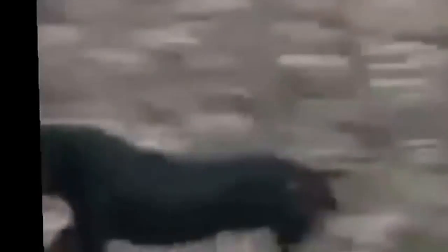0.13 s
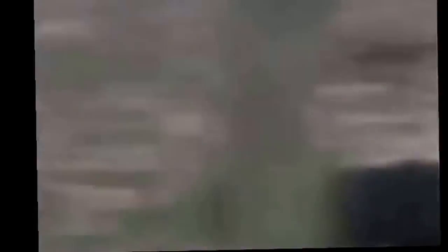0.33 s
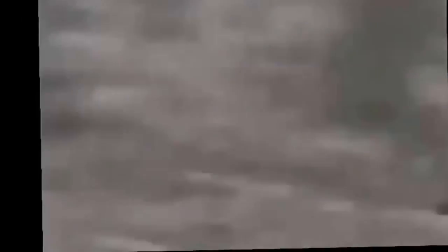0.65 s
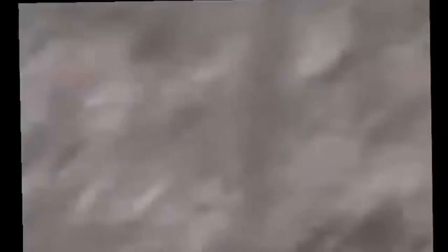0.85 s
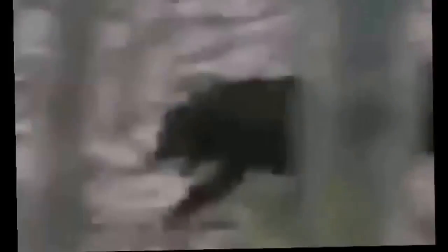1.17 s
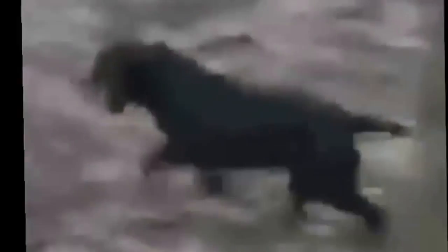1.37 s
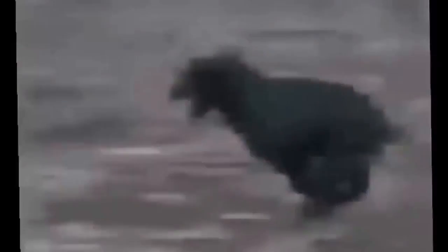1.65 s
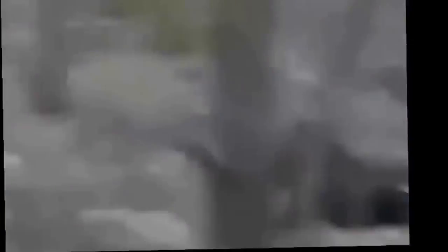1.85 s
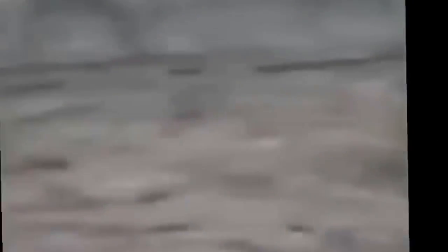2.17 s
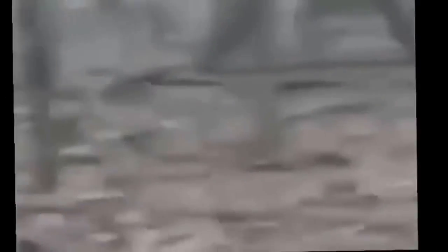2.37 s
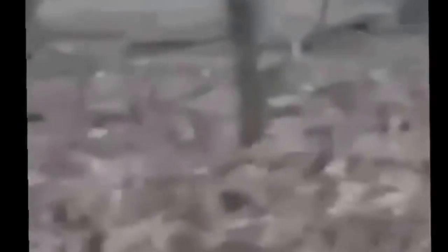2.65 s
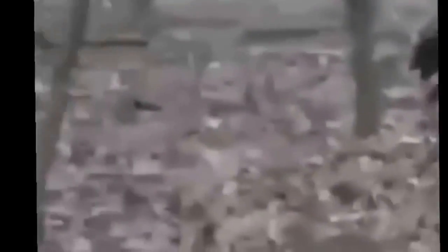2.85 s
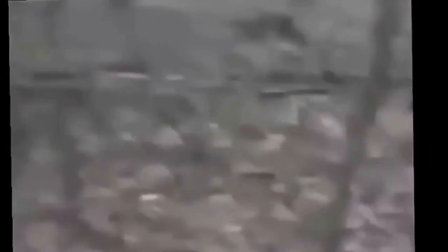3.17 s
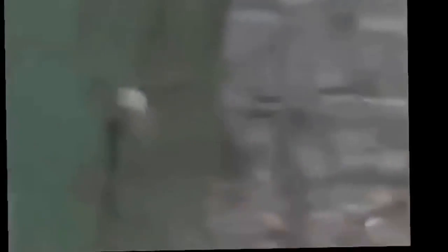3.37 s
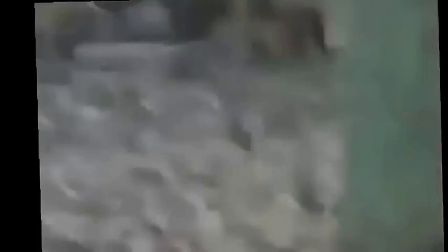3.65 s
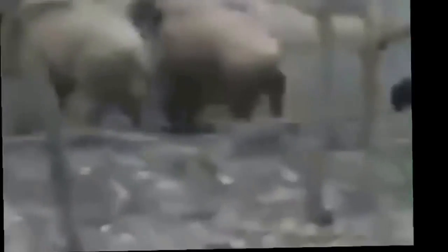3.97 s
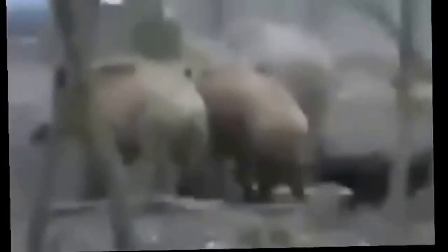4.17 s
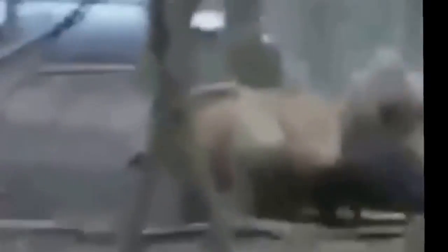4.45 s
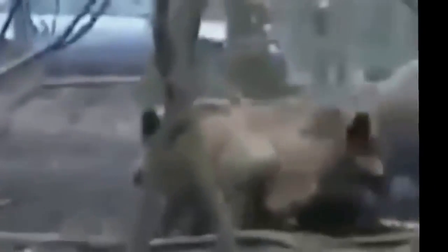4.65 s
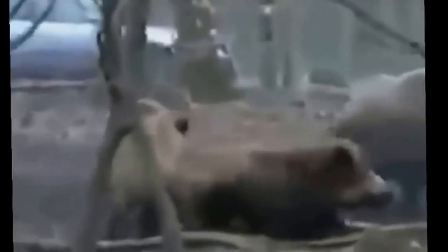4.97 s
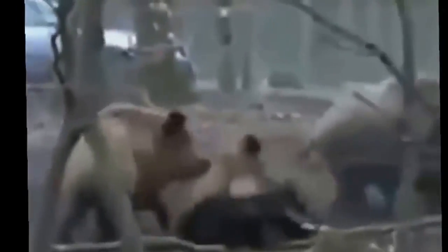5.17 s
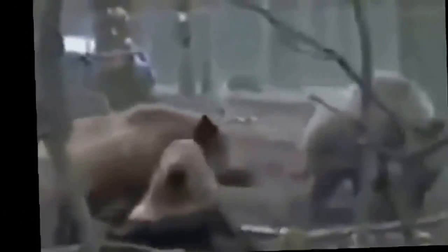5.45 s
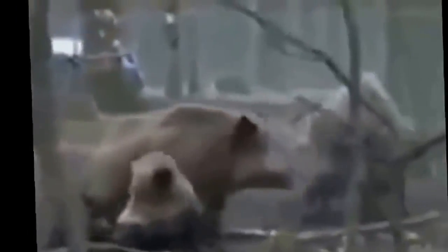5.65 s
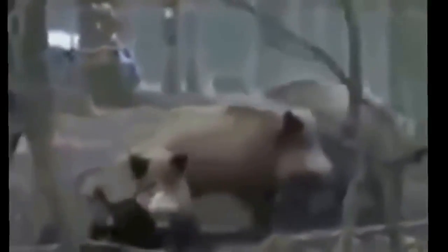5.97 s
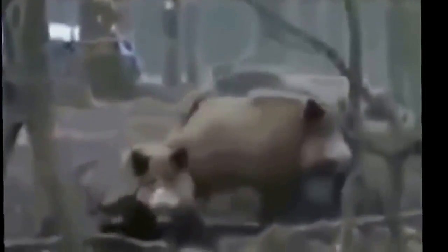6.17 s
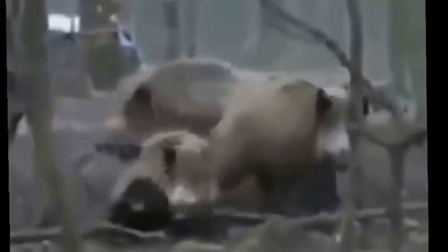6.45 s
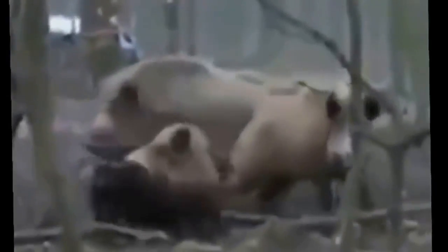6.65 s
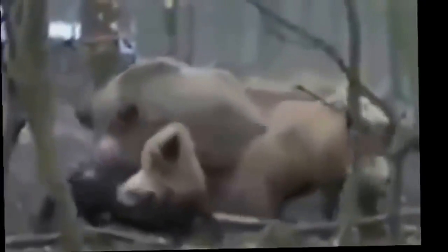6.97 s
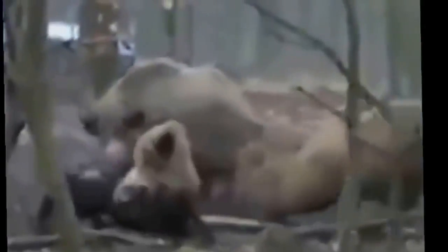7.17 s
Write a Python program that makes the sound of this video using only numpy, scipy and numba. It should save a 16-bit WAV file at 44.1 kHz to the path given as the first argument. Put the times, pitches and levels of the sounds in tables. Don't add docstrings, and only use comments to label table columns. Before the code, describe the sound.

A crowding herd of boars snorts and grunts irregularly over rustling leaf litter, hoarse squeals breaking out farther off, muffled low-grade sound.

```python
import sys
import numpy as np
from scipy import signal
from scipy.fft import dct
from scipy.io import wavfile
from scipy.ndimage import uniform_filter1d, minimum_filter1d
from numba import njit

SR = 44100
rng = np.random.default_rng(int(sys.argv[2]) if len(sys.argv) > 2 else 0)


def boost(x):
    u = np.asarray(x, float) / 20
    return 10 ** u


def materialize(psi):
    bounded = np.clip(np.atleast_2d(psi).T, -1, 1)
    quanta = np.round(bounded * 32767).astype(np.int16)
    wavfile.write(sys.argv[1], SR, quanta)


N = 322812


def rms_one(x):
    return x / np.sqrt(np.mean(x ** 2) + 1e-20)


def band_passed(x, low_hz, high_hz):
    return signal.sosfilt(signal.butter(2, [low_hz, high_hz], "band", fs=SR, output="sos"), x)


def high_passed(x, hz):
    return signal.sosfilt(signal.butter(2, hz, "high", fs=SR, output="sos"), x)


def in_time(rows):
    s, *columns = np.transpose(rows)
    return [np.interp(np.arange(N) / SR, s, c) for c in columns]


def at_hz(points, hz):
    points_hz, points_db = np.array(points).T
    return np.interp(np.log(hz), np.log(points_hz), points_db)


def full_rate(v):
    return np.interp(np.arange(N) / 32, np.arange(len(v)), v)


def peaks_db(start, hold, db, rise, fall):
    t = np.arange(0, N + 32, 32) / SR
    start, end = start[:, None], (start + hold)[:, None]
    return db[:, None] - rise * np.maximum(start - t, 0) - fall * np.maximum(t - end, 0)


def drift(rate):
    r = np.exp(-80 * np.pi * rate / SR)
    slow = signal.lfilter([1], [1, -2 * r, r * r], rng.standard_normal(N // 40 + 2002))[2000:]
    return np.interp(np.arange(N) / 40, np.arange(len(slow)), rms_one(slow))


@njit
def moving_pole(x, r, cosine):
    y = np.zeros(len(x))
    for i in range(2, len(x)):
        drive = (1 - r * r) / 2 * (x[i] - x[i - 2])
        y[i] = drive + 2 * r * cosine[i] * y[i - 1] - r * r * y[i - 2]
    return y


def resonance(x, hz, width_hz):
    cosine = np.cos(2 * np.pi * hz / SR) * np.ones(len(x))
    return moving_pole(x + 1e-18, np.exp(-np.pi * width_hz / SR), cosine)


def evened(x, span_s):
    size = int(span_s * SR)
    power = uniform_filter1d(uniform_filter1d(x ** 2, size=size), size=size)
    return x / np.sqrt(np.abs(power) + 1e-12)


def coloured(x, spectrum, patchy_db, rate):
    out, edges = 0, 27.5 * 2 ** np.arange(0, 8.6, .5)
    for low, high in zip(edges, edges[1:]):
        if high > spectrum[0][0]:
            level_db = at_hz(spectrum, np.sqrt(low * high)) + patchy_db * drift(rate)
            out = band_passed(x, low, high) * boost(level_db) - out
    return out


def squeal():
    # [t/s, level of lowest resonance/dB]
    bursts = [
        [(0.0, -40.5), (0.168, -46), (0.226, -29), (0.332, -55.5), (0.368, -37.5), (0.472, -45), (0.748, -53),
         (0.8, -40)],
        [(3.33, -42.5), (3.385, -36), (3.468, -37.5), (3.566, -39), (3.61, -41.5), (3.645, -50), (3.75, -40),
         (4.08, -48.5), (4.22, -66)],
        [(5.4, -52), (5.49, -30), (5.525, -29), (5.56, -44), (5.62, -38), (5.66, -42), (5.7, -52.5),
         (5.74, -50)],
        [(5.77, -42.5), (5.82, -37), (5.86, -36), (5.895, -41), (5.95, -38), (5.99, -37), (6.02, -50),
         (6.11, -43.5), (6.2, -69)],
    ]
    # [f/Hz, width/Hz, level/dB]
    tract = [(574.7, 14, 2), (1040, 70, 3), (1220, 77, -16.5), (1630, 230, -1), (1915, 40, -7.5),
             (3470, 450, -13)]
    level = 0
    for rows in bursts:
        level = level + boost(in_time([(rows[0][0] - .05, -90), *rows, (rows[-1][0] + 0.023, -90)])[0])
    voice = rng.standard_normal(N) * boost(2.0 * drift(65))
    slide = 1 + .011 * drift(5.5)
    out = 0
    for hz, width_hz, db in tract:
        ring = resonance(resonance(voice, hz * slide, 1.9 * width_hz), hz * slide, 1.9 * width_hz)
        out = out + boost(db + 1.8 * drift(14)) * evened(ring, 0.2)
    return level * boost(3.0) * out


def scuffle():
    # [t/s, level/dB]
    trampling = [(0.0, -39), (0.5, -32.5), (1.1, -33.5), (1.5, -39.5), (2.3, -41), (3.2, -41.5),
                 (3.65, -41), (4.2, -39.5), (4.72, -44.5), (5.1, -34), (5.6, -38.5), (6.1, -30.5),
                 (6.6, -40.5), (7.32, -38.5)]
    # [t/s, level/dB]
    hooves = [(0.342, -30), (0.936, -24.5), (0.959, -24.5), (1.089, -25.5), (1.592, -32.5), (2.0, -30),
              (2.382, -34), (2.67, -41.5), (3.33, -34), (3.85, -25), (4.78, -58), (4.972, -33.5),
              (5.288, -26), (5.73, -40), (5.992, -29.5), (6.322, -26), (6.692, -31.5), (6.85, -27),
              (7.16, -30.5), (7.261, -34)]
    # [f/Hz, density/dB per Hz]
    leaves = [(400, -19), (1500, 5.5), (3000, 5), (4200, 10), (6000, 5)]
    sizes = boost(1.0 * np.minimum(rng.exponential(1, N), 5)) * rng.choice([-1, 1], N)
    crackles_per_s = 5000 * boost(3.0 * drift(25))
    crackle = sizes * (rng.random(N) < crackles_per_s / SR)
    s, db = np.transpose(hooves)
    hooves_db = full_rate(peaks_db(s, 0 * s, db, rise=401, fall=190.5).max(0))
    level_db = np.maximum(in_time(trampling)[0], hooves_db) - 3.0
    return boost(level_db) * evened(coloured(crackle, leaves, patchy_db=5.0, rate=3.3), 0.067)


def forest():
    # [f/Hz, density/dB per Hz]
    colour = [(18, -52), (30, -11), (190, 4), (569, 3.5), (683, -19), (1010, -0.5), (1150, -13.5),
              (1480, -1), (7000, -20.5), (9100, -39.5), (15400, -120)]
    level_db = -42
    air = coloured(rng.standard_normal(N), colour, patchy_db=2.0, rate=9)
    return high_passed(boost(level_db) * rms_one(air), 110)


def trees(x):
    t = np.arange(SR // 2) / SR
    echoes = rng.standard_normal(len(t)) * boost(-60 * t / 0.21) * (t > .012)
    echoes = signal.lfilter([.3], [1, -.7], echoes)
    return signal.fftconvolve(x, echoes / np.sqrt(np.sum(echoes ** 2)))[:N]


def effort():
    # [start/s, hold/s, throat/dB, throat/Hz, snout above throat/dB]
    low_grunts = [(0.024, 0.052, -25.5, 236.5, -5.5), (0.233, 0.033, -20.5, 266.1, -7),
                  (0.38, 0.075, -31, 233, -7), (0.527, 0.071, -29.5, 257.4, -8),
                  (0.792, 0.063, -26.5, 243.3, -6), (0.942, .17, -25.5, 256.2, -7),
                  (1.285, 0.037, -28, 245.7, -8), (1.391, 0.062, -23, 292, -9),
                  (1.602, 0.12, -28.5, 244.5, -7), (1.704, 0.13, -27.5, 259.2, -7.5),
                  (2.156, 0.071, -27, 240.5, -10.5), (2.356, 0.11, -33, 228.5, -12),
                  (2.438, 0.065, -31.5, 223, -9), (2.662, 0.024, -33, 238, -3.5),
                  (2.722, 0.058, -28.5, 242.8, -6.5), (2.833, 0.12, -32, 247, -8),
                  (3.085, 0.02, -25.5, 261.4, -4.5), (3.273, 0.081, -28.5, 250, -5.5),
                  (3.569, 0.016, -29.5, 266, -1), (3.717, 0.051, -32, 231.6, 0),
                  (4.385, 0.048, -30.5, 252.5, -4.5), (5.164, 0.056, -28, 221.5, -1.5),
                  (5.816, 0.083, -29, 262, -5), (6.283, 0.12, -29.5, 239.4, -6.5),
                  (6.571, 0.046, -28.5, 213.2, -3.5)]
    # [start/s, hold/s, throat/dB, throat/Hz, snout above throat/dB]
    high_grunts = [(1.995, 0.042, -25.5, 326, -10), (2.058, 0.049, -25.5, 276.4, -8.5),
                   (3.846, 0.069, -27.5, 302.4, 1), (4.829, 0.026, -27.5, 341, -7),
                   (5.056, 0.049, -31, 334, 0.5), (5.282, 0.058, -26, 334, -11.5),
                   (5.455, 0.059, -23.5, 319.3, -13.5), (5.713, 0.041, -28, 294, -5),
                   (5.972, 0.048, -28, 277, -4.5), (6.044, 0.11, -27.5, 326.3, -3),
                   (6.224, .06, -27.5, 334, -1), (6.658, 0.061, -29.5, 281.3, -5.5),
                   (6.805, 0.055, -28, 328, 2.5), (6.904, 0.031, -27, 246, -6.5),
                   (7.164, 0.016, -25.5, 375.7, -7.5), (7.061, 0.04, -31.5, 266, -10)]
    # [t/s, level/dB]
    unrest = [(0.0, -34.5), (0.7, -44.5), (1.2, -43), (1.9, -40.5), (2.3, -45), (2.6, -55), (3.0, -40),
              (3.45, -40), (3.95, -32), (4.3, -45.5), (4.75, -50.5), (5.0, -37), (5.6, -36.5), (6.1, -44),
              (6.5, -38.5), (7.0, -39), (7.32, -44.5)]
    sag_hz_per_s, murmur_throat_db = 350, -8
    start, hold, db, hz, snout_db = np.transpose(low_grunts + high_grunts)
    throat = peaks_db(start, hold, db, rise=326, fall=478.5)
    snout = peaks_db(start, hold, db + snout_db, rise=392, fall=114.5)
    lead = throat.argmax(0)
    t = np.arange(len(lead)) * 32 / SR
    into_s = np.clip(t - start[lead], 0, hold[lead]) - hold[lead] / 2
    pitch = uniform_filter1d(hz[lead] - sag_hz_per_s * into_s, size=40)
    murmur, = in_time(unrest)
    return (np.maximum(full_rate(throat.max(0)), murmur + murmur_throat_db), full_rate(pitch),
            np.maximum(full_rate(snout.max(0)), murmur))


def all_flaps():
    # [t/s, peak/dB, ring/Hz, upper ring/Hz, upper ring above peak/dB]
    cracks = [(0.245, -12.5, 1220, 3110, -7), (0.798, -10.5, 1128, 3030, -21),
              (1.43, -4, 1224, 2490, -18.5), (2.002, -5.5, 1315, 2306, -6.5),
              (2.07, -11.5, 1324, 2950, -10.5), (2.404, -23, 1074, 2650, 6.5),
              (2.683, -11, 1596, 2260, -7.5), (3.114, -15.5, 1273, 2520, 4), (4.379, -18.5, 836, 2560, -6),
              (4.408, -8.5, 1266, 2015, -10.5), (4.828, -7.5, 1406, 1760, -3.5),
              (5.192, -30, 992, 2200, 12), (5.287, -2, 1413, 1870, -7), (5.486, -5.5, 1466, 2046, -8.5),
              (5.736, -5, 1080, 2380, -2.5), (6.04, -9.5, 1027, 3500, -10), (6.4, -26.5, 1120, 2380, 7),
              (6.65, -15, 1755, 2890, 4), (6.676, -7.5, 1220, 2346, -2.5), (6.857, -10.5, 605, 1966, -12.5),
              (7.125, -10.5, 1323, 1920, -12), (7.149, -26.5, 1527, 1710, -13),
              (7.175, -3, 1410, 2134, -5.5), (2.376, -30, 870, 2770, -4)]
    # [t/s, peak/dB, ring/Hz]
    more_cracks = [(0.044, -13.5, 961), (0.933, -18, 1260), (0.96, -9, 1149), (1.049, -12, 763),
                   (1.312, -15.5, 1040), (1.387, -12, 1164), (1.405, -12, 1210), (1.604, -14.5, 830),
                   (1.798, -18, 1476), (1.828, -12.5, 654), (2.447, -13.5, 990), (2.654, -13.5, 1274),
                   (2.827, -17, 1063), (2.923, -18, 884), (3.226, -17.5, 1130), (3.285, -10, 1218),
                   (3.893, -10.5, 1247), (4.807, -20, 1266), (4.978, -20, 890), (5.065, -8.5, 1274),
                   (5.312, -8, 1810), (5.714, -10.5, 1105), (6.087, -8, 817), (6.132, -19.5, 1150),
                   (6.157, -15.5, 1210), (6.219, -13, 1330), (6.241, -5, 1265), (6.264, -5.5, 1291),
                   (6.834, -11.5, 780), (6.92, -4.5, 920),
                   (0.276, -13.5, 990), (0.409, -11, 845), (0.527, -16.5, 1070), (0.816, -15.5, 1100),
                       (1.979, -21, 1254), (2.028, -15, 1109), (2.105, -17.5, 690), (2.181, -17.5, 574),
                       (2.228, -18, 559), (2.431, -18, 660), (2.476, -17, 563), (2.498, -23.5, 615),
                       (2.641, -25, 1476), (2.72, -18, 756), (2.742, -18.5, 685), (3.728, -15.5, 792),
                       (4.85, -15.5, 1520), (5.048, -31.5, 1120), (5.16, -17.5, 974), (5.335, -24.5, 1540),
                       (5.463, -15.5, 1530), (5.69, -21.5, 1690), (5.858, -18.5, 1335), (5.998, -14, 494),
                       (6.705, -15.5, 1280), (6.817, -16.5, 750), (7.019, -19.5, 1730), (7.049, -24.5, 1750),
                       (7.073, -26.5, 905), (7.102, -20, 1630)]
    upper_hz, upper_db = 2273, -13
    return sorted(cracks + [(*row, upper_hz, upper_db) for row in more_cracks])


def vocal_folds(jitter, uneven_db, puff_s):
    flaps_per_s = 44
    hard = np.r_[0, np.array(all_flaps())[:, 0], N / SR]
    cycles = np.r_[0, np.cumsum(np.maximum(1, np.round(np.diff(hard) * flaps_per_s)))]
    count = int(cycles[-1])
    chance = rng.standard_normal((count, 2))
    times = np.interp(np.arange(count) + jitter * chance[:, 0], cycles, hard)
    pulses = np.zeros(N)
    pulses[np.clip((times * SR).astype(int), 0, N - 1)] = boost(uneven_db * np.minimum(chance[:, 1], 1))
    fall = np.exp(-1 / (puff_s * SR))
    puff = signal.lfilter([1], [1, -fall], pulses) * rng.standard_normal(N)
    return rms_one(pulses), rms_one(puff)


def grunts():
    throat_db, throat_hz, snout_db = effort()
    snout_hz, upper_snout_hz = 4.1 * throat_hz, 2.7 * throat_hz
    rasp_db = -41 + 0.79 * (snout_db + 34)
    pulses, puff = vocal_folds(jitter=.24, uneven_db=4.5, puff_s=0.011)

    low = pulses + 0.6 * puff + 0.35 * rng.standard_normal(N)
    throat = resonance(resonance(low, throat_hz, 44), throat_hz, 90)
    throat = band_passed(throat - .25 * resonance(low, .62 * throat_hz, 150), 80, 450)
    chest = band_passed(puff, 25, 110)

    upper = 0.1 * pulses + puff + .25 * rng.standard_normal(N)
    snout = resonance(upper, snout_hz, 330) - 0.57 * resonance(upper, 1.35 * snout_hz, 200)
    snout = snout + .9 * resonance(resonance(upper, upper_snout_hz, 330), upper_snout_hz, 330)
    rasp = resonance(upper, 2175, 500) - 0.66 * resonance(upper, 3310, 600)

    out = boost(throat_db) * (evened(throat, 0.027) + boost(-24.5) * evened(chest, 0.042))
    out = out + boost(snout_db + 0.5) * evened(snout, 0.053) + boost(rasp_db + 2.0) * evened(rasp, 0.076)
    return out + nasals(upper + .3 * pulses)


def hard_flaps():
    out, t = np.zeros(N + SR), np.arange(SR // 20) / SR
    throat_db, throat_hz, _ = effort()
    flaps = all_flaps()
    grain = rng.standard_normal((len(flaps), len(t)))
    rise = 1 - np.exp(-t / .0004)
    for (s, peak_db, hz, upper_hz, upper_db), noise in zip(flaps, grain):
        i = int(s * SR)
        upper_gain = boost(upper_db + 7.0)
        ring = np.sin(2 * np.pi * hz * t) * np.exp(-t / .0019)
        upper = upper_gain * np.sin(2 * np.pi * upper_hz * t) * np.exp(-t / 0.00081)
        spit = .7 * resonance(noise, hz, 500) + upper_gain * resonance(noise, upper_hz, 900)
        crack = rise * (ring + upper + spit * np.exp(-t / 0.0038))
        crack *= boost(peak_db) * max(1, upper_gain) / np.abs(crack).max()
        thump = boost(throat_db[i] + 7) * np.sin(2 * np.pi * throat_hz[i] * t) * np.exp(-t / 0.011)
        out[i:i + len(t)] -= boost(1.5) * crack + rise * thump
    return signal.sosfilt(signal.butter(8, 3800, fs=SR, output="sos"), out[:N])


def nasals(air):
    # [start/s, hold/s, level/dB, first f/Hz, last f/Hz]
    narrowings = [(0.188, 0.058, -34.5, 1034, 1025), (0.366, 0.072, -29, 787, 820),
                  (0.387, 0.042, -37.5, 1930, 1956), (2.004, 0.06, -29.5, 1287, 1295),
                  (2.078, 0.043, -33.5, 1740, 1526), (2.168, 0.055, -38, 700, 576),
                  (2.411, 0.046, -33.5, 730, 649), (2.728, 0.065, -35, 717, 730),
                  (3.067, 0.066, -33.5, 1746, 2030), (3.689, 0.063, -31.5, 795, 770),
                  (4.826, 0.016, -34.5, 1527, 1404), (5.287, 0.053, -26, 1536, 1355),
                  (5.461, 0.032, -28.5, 736, 700), (6.051, 0.12, -32.5, 666, 664),
                  (6.108, 0.027, -40, 1158, 1225), (6.853, 0.019, -24.5, 1964, 1957),
                  (6.786, 0.075, -30.5, 695, 713), (7.127, 0.061, -29.5, 769, 564),
                  (1.391, 0.033, -30.5, 1187, 1197), (0.789, 0.026, -31.5, 893, 810),
                  (0.959, 0.035, -31, 1130, 1148), (1.048, 0.07, -40, 819, 688),
                  (1.301, 0.03, -33.5, 603, 585), (1.604, 0.043, -31, 769, 741),
                  (3.388, 0.19, -40.5, 1990, 2040), (3.712, 0.19, -33, 985, 1086),
                  (3.962, 0.2, -39.5, 1072, 1000), (4.502, .15, -45, 900, 878),
                  (5.571, 0.1, -33.5, 1040, 995), (5.795, 0.16, -34.5, 1020, 1024),
                  (5.63, 0.079, -38.5, 1930, 2140)]
    width_hz = 135
    start, hold, db, first_hz, last_hz = np.transpose(narrowings)
    levels = peaks_db(start, hold, db, rise=1500, fall=603.5)
    out = np.zeros(N)
    for k, level in enumerate(levels):
        end = start[k] + hold[k]
        part = slice(int((start[k] - .1) * SR), min(N, int((end + .1) * SR)))
        hz = np.interp(np.arange(N)[part] / SR, [start[k], end], [first_hz[k], last_hz[k]])
        note = resonance(resonance(air[part], hz, width_hz), hz, 1.6 * width_hz)
        out[part] += boost(full_rate(level)[part]) * evened(note, 0.025)
    return out


def spits():
    # [t/s, level/dB, dying time/s, lowest f/Hz, highest f/Hz]
    bursts = [(0.928, -24, 0.013, 900, 3550), (0.947, -18.5, 0.013, 2160, 5840),
              (0.968, -29, 0.014, 2050, 4420), (1.004, -18.5, 0.0067, 250, 3100),
              (1.03, -23, 0.0085, 198, 684), (1.051, -24, 0.0097, 500, 3070),
              (2.656, -29, 0.013, 1500, 3400), (2.683, -26.5, 0.007, 905, 2960),
              (2.72, -33, 0.0071, 600, 3580), (2.801, -18, 0.004, 790, 1430),
              (2.825, -31, 0.0045, 890, 3330), (2.923, -24.5, .012, 800, 2780),
              (3.729, -27.5, 0.0078, 800, 3270), (3.766, -27.5, 0.019, 1450, 3200),
              (3.96, -27.5, 0.0057, 816, 3240), (4.377, -25, 0.011, 610, 3490),
              (4.396, -22.5, 0.011, 700, 2520), (4.407, -29, 0.013, 1030, 3580),
              (4.806, -27, 0.015, 1290, 3490), (4.828, -19.5, 0.0068, 1480, 3640),
              (4.978, -24, 0.0027, 398, 1680), (5.287, -24, 0.026, 3050, 3590), (5.19, -26, .02, 446, 766),
              (5.21, -25.5, 0.0093, 1784, 2660), (5.262, -28, .006, 500, 1300),
              (6.13, -21, 0.01, 590, 3220), (6.22, -20, 0.0047, 1000, 2520),
              (6.236, -21, 0.0053, 2000, 2650), (6.279, -22, 0.0094, 391, 1600),
              (6.307, -24, 0.011, 2010, 3430), (6.652, -24.5, 0.011, 1180, 3620),
              (7.19, -28, 0.02, 1833, 3680), (5.17, -28.5, 0.045, 1960, 3670),
              (6.815, -29, .06, 2340, 3740), (2.195, -30, 0.017, 1930, 3270),
              (3.19, -31, 0.065, 1095, 1370), (3.31, -33.5, 0.017, 2350, 3610),
              (0.515, -28, 0.025, 2360, 3930), (0.734, -32.5, .02, 1900, 2820),
              (1.80, -29.5, 0.048, 880, 2600)]
    rise_s = .001
    out, t = np.zeros(N + SR), np.arange(SR // 10) / SR
    for (s, db, dying_s, low_hz, high_hz), noise in zip(bursts, rng.standard_normal((len(bursts), len(t)))):
        i = int(s * SR)
        shape = (1 - np.exp(-t / rise_s)) * np.exp(-t / dying_s)
        out[i:i + len(t)] += boost(db + 2.5) * rms_one(band_passed(noise, low_hz, high_hz)) * shape
    return out[:N]


def twigs():
    # [t/s, peak/dB]
    snaps = [(0.949, -9.5), (2.3755, -36), (3.892, -11.5), (4.786, -20), (1.187, -23.5), (3.088, -25),
             (4.979, -16.5), (5.998, -10), (6.3114, -13.5)]
    out, t = np.zeros(N), np.arange(400) / SR
    for (s, peak_db), noise in zip(snaps, rng.standard_normal((len(snaps), 400))):
        i = int(s * SR)
        out[i:i + 400] += boost(peak_db + 5.5) * noise * np.exp(-t / 0.00075)
    return high_passed(out, 1200)


def yelp():
    # [t/s, level/dB, mouth resonance/Hz]
    rows = [
        (3.04, -39, 1160),
        (3.084, -19, 1220),
        (3.14, -36, 1174),
        (3.267, -28.5, 1230),
        (3.289, -24, 1220),
        (3.318, -26.5, 1220),
        (3.341, -49.5, 1150),
    ]
    before = (rows[0][0] - .02, -90, rows[0][2])
    after = (rows[-1][0] + 0.066, -90, rows[-1][2])
    level_db, hz = in_time([before, *rows, after])
    voice = rng.standard_normal(N)
    mouth = evened(resonance(resonance(voice, hz, 150), hz, 150), 0.23)
    return boost(level_db - 4.0) * (mouth + 0.61 * rms_one(resonance(voice, 1880, 250)))


def scene():
    herd = grunts() + hard_flaps() + squeal() + yelp()
    mid = herd + boost(-14.5) * trees(herd) + scuffle() + twigs() + forest() + spits()
    return np.array([mid, mid])


def coarse_blocks(x, apart_size, attack_db, masked_db, size, count):
    # [f/Hz, step/dB]
    step_over_band = [(100, -7), (400, -1.5), (1000, 3), (3000, 5.5), (5500, 7.5), (7000, 10)]
    # [f/Hz, step/dB]
    masked = [(500, -27.5), (2000, -20.5), (4000, -11), (6000, -19), (6600, -12), (7000, -5.5)]
    # [f/Hz, level/dB]
    apart_colour = [(60, 5.5), (250, -0.5), (1000, -4.5), (2000, -5), (5000, -2)]
    scatter_db, apart_share = 3.0, 0.14
    finer_db_per_crest_db = 2.0
    lead = 1136 % size
    window = np.sin(np.pi * (np.arange(2 * size) + .5) / (2 * size))
    padded = np.pad(x, (size + lead, 3 * size))
    blocks = np.lib.stride_tricks.sliding_window_view(padded, 2 * size)[::size] * window
    a, b, c, d = np.split(blocks, 4, axis=1)
    lines = dct(np.c_[-c[:, ::-1] - d, a - b[:, ::-1]], type=4, norm="ortho")

    hz = (np.arange(size) + .5) * SR / 2 / size
    band = np.unique((14 * np.log(1 + hz / 700)).astype(int), return_inverse=True)[1]
    member = band[:, None] == np.arange(band.max() + 1)
    band_rms = np.sqrt(lines ** 2 @ member / member.sum(0))[:, band]
    block_rms = np.sqrt(np.mean(lines ** 2, axis=1, keepdims=True) + 1e-14)
    chance = rng.standard_normal((2, len(lines), band.max() + 1))[:, :, band]
    least_step = block_rms * boost(at_hz(masked, hz) + masked_db)
    step = np.maximum(band_rms * boost(at_hz(step_over_band, hz)), least_step)
    step = -minimum_filter1d(-step, size=count, axis=0)

    crest_db = 20 * np.log10(np.abs(blocks).max(axis=1, keepdims=True) / block_rms + 1e-9)
    finer_db = np.clip(finer_db_per_crest_db * (crest_db - attack_db), 0, 18) * np.where(hz < 3900, 1, .3)
    step = step * boost(scatter_db * chance[0] - finer_db) + 1e-9

    split = chance[1] > 1 - 2 * apart_share
    apart = split * apart_size * boost(at_hz(apart_colour, hz)) * step * rng.standard_normal(lines.shape)
    pair = np.array([lines + apart, lines - apart])
    pair = np.sign(pair) * np.floor(np.abs(pair) / step + .42) * step
    u, v = np.split(dct(pair, type=4, norm="ortho"), 2, axis=2)
    back = np.concatenate([v, -v[..., ::-1], -u[..., ::-1], -u], axis=2) * window
    return (back[:, 1:, :size] + back[:, :-1, size:]).reshape(2, -1)[:, lead:lead + N]


def attacks(x):
    rise_db = 15
    power = high_passed(x, 1500) ** 2
    before = np.roll(uniform_filter1d(power, size=1024), 600)
    sudden = uniform_filter1d(power, size=128) > before * boost(2 * rise_db)
    return uniform_filter1d(-minimum_filter1d(-1. * sudden, size=1900), size=200)


def top_cut(x):
    return signal.sosfilt(signal.butter(12, 7950, fs=SR, output="sos"), x)


def record(dry):
    overload, port_air_db, cutoff_hz = 1.25, -76, 6980
    mic = high_passed(dry.mean(0), 40)
    mic = overload * np.tanh(mic / overload)
    long = coarse_blocks(mic, apart_size=0.08, attack_db=14.5, masked_db=12.0, size=2048, count=1)
    short = coarse_blocks(mic, apart_size=0.05, attack_db=6.5, masked_db=1.5, size=256, count=3)
    rounded = long + attacks(mic) * (short - long)
    air = rms_one(band_passed(rng.standard_normal(N), 40, 85))
    rounded = rounded + boost(port_air_db + 4.0 * drift(4)) * air * [[1], [-1]]
    mix = signal.sosfilt(signal.ellip(12, .5, 75, cutoff_hz, fs=SR, output="sos"), rounded)
    return top_cut(mix)


dry = scene()
out = record(dry)
materialize(out)
```